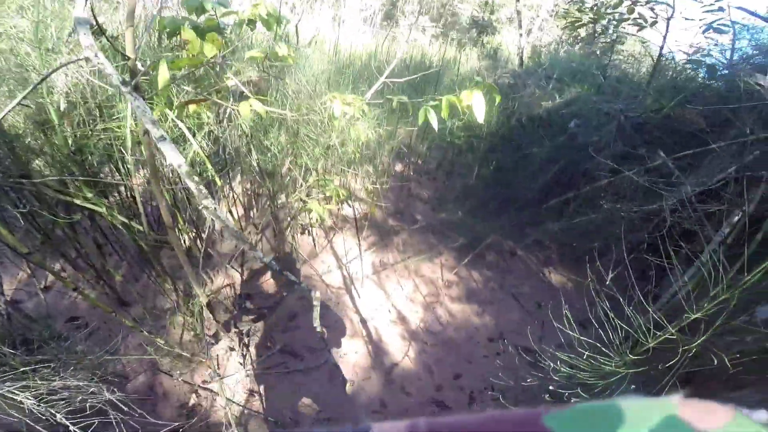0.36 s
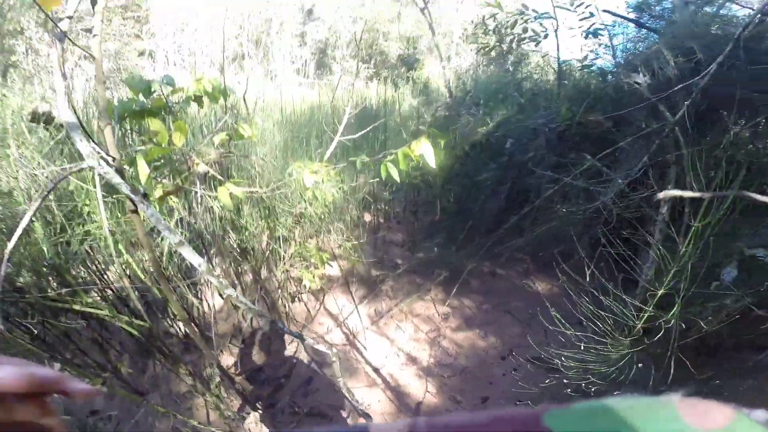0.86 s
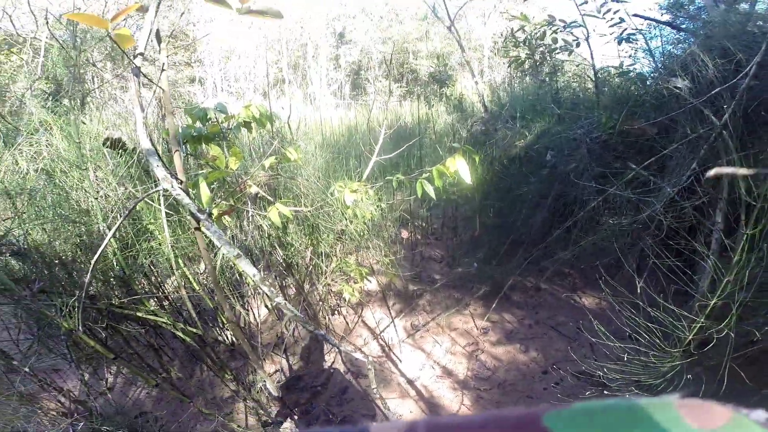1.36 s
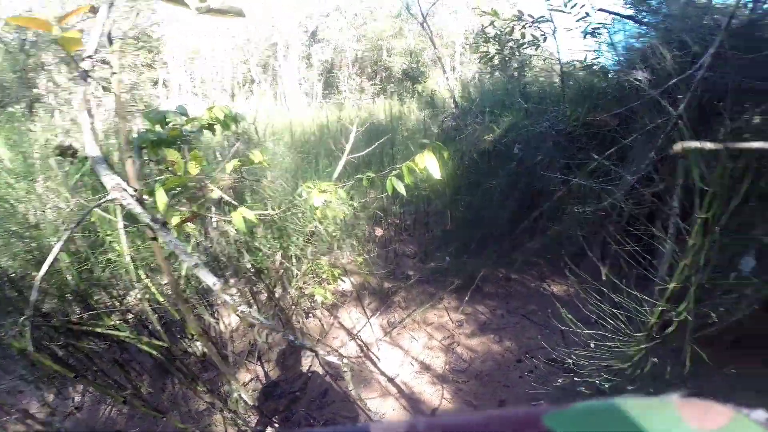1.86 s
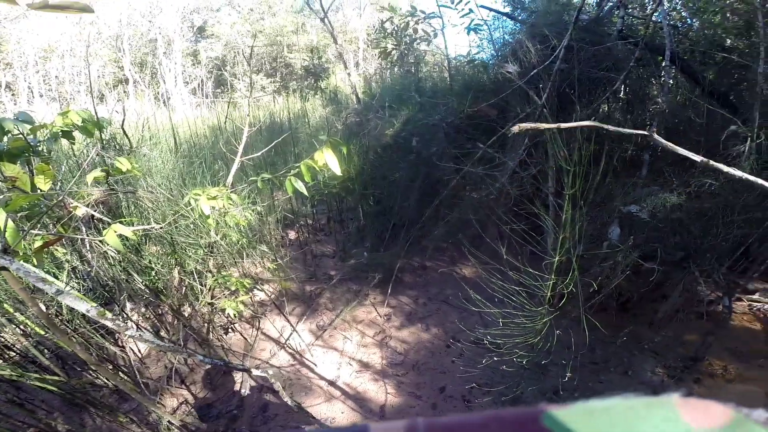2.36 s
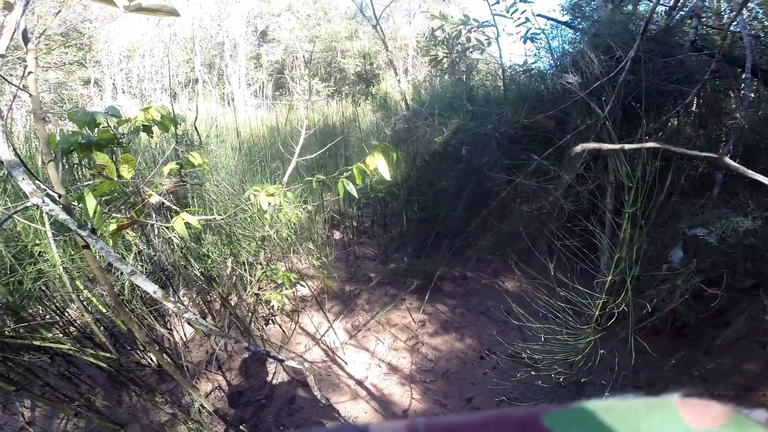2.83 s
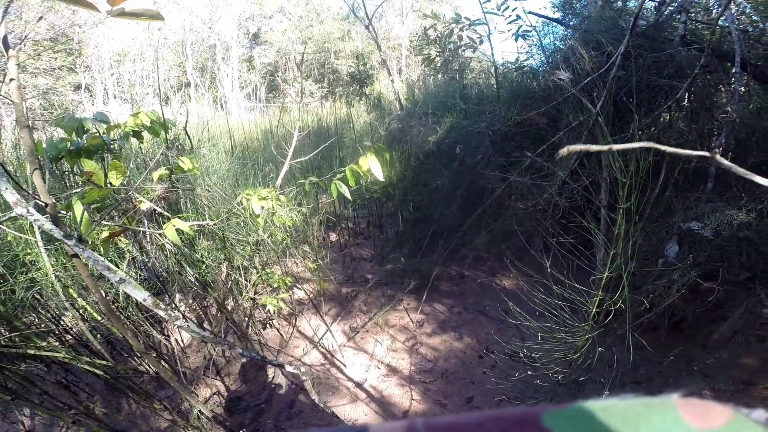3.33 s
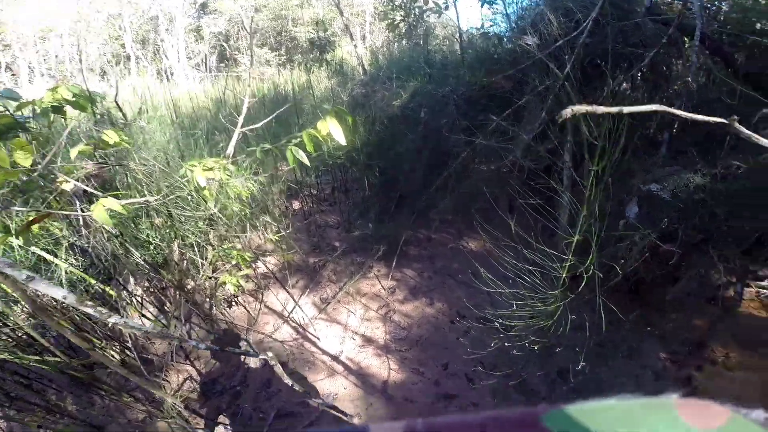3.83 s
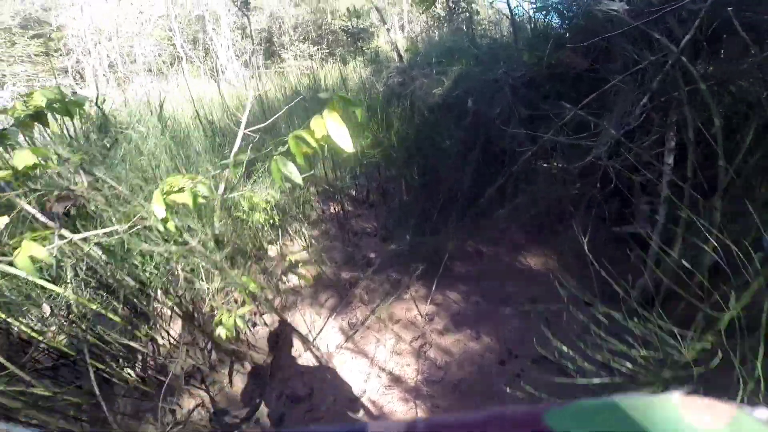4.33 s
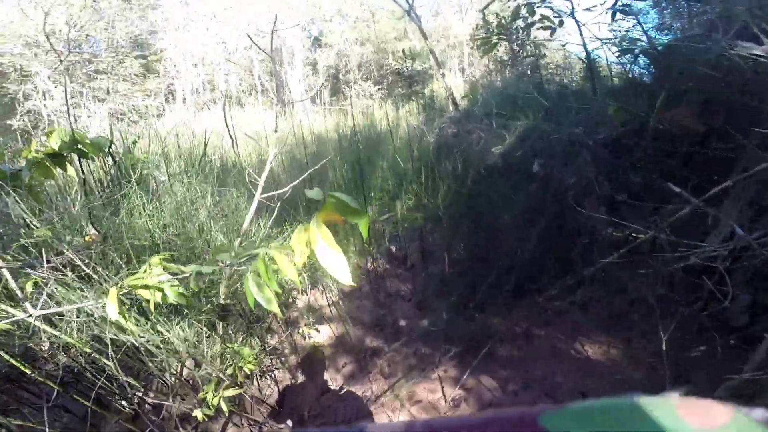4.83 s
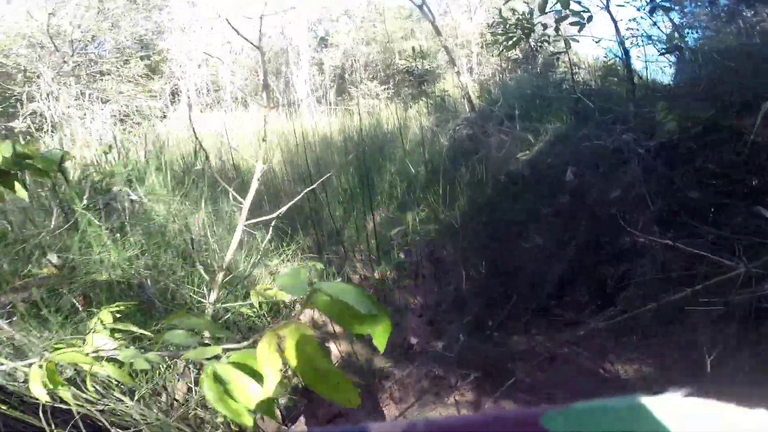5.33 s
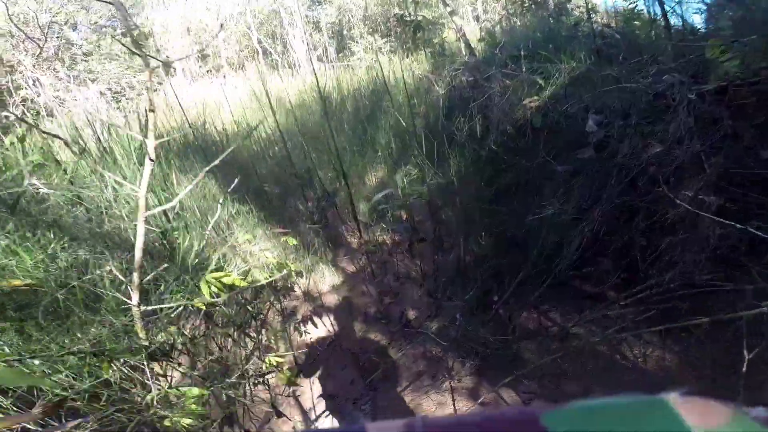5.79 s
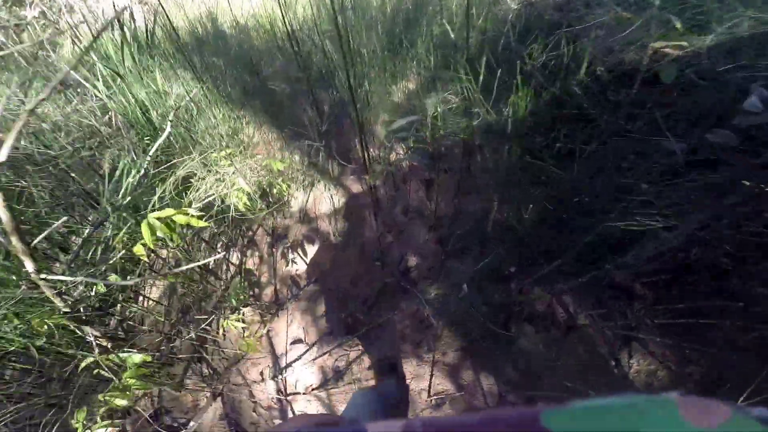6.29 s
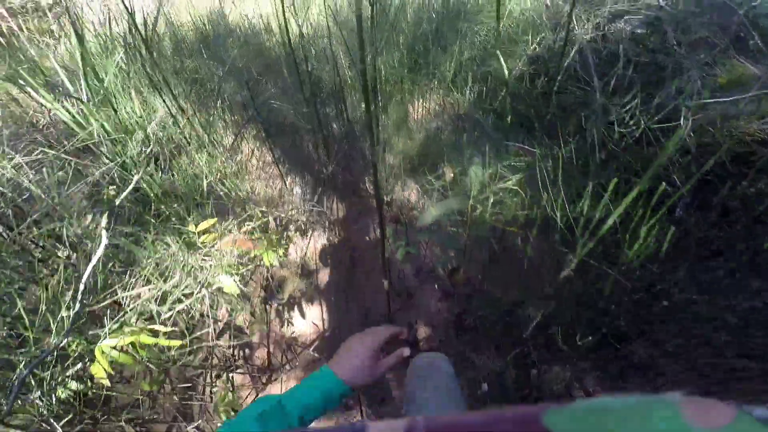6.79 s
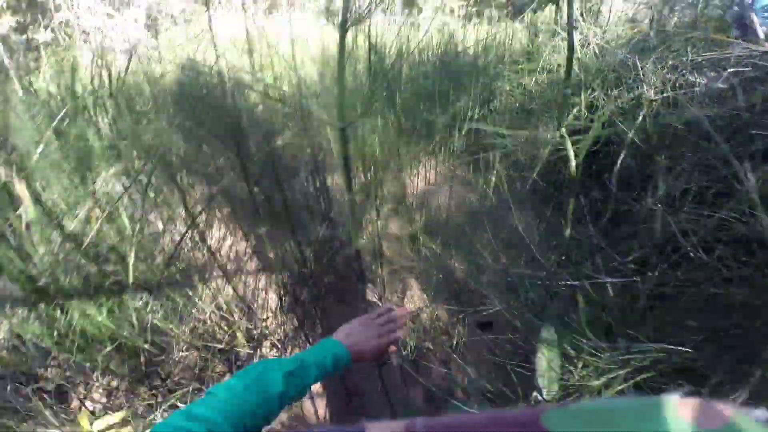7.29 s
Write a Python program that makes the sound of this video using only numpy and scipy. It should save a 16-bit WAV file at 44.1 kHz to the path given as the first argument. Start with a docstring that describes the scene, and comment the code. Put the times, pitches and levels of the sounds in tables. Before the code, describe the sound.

A distant hound bays in long, hoarse, steady howls across dry scrub while someone close by brushes through grass and snaps twigs.

```python
"""Dry scrub: a hound bays four times from some way off; trunks and bushes return a thin dying wash.
The voice is a strong sine fundamental plus wavering overtones, half-pitch lines and noise breath.
Close by, someone pushes through grass: random ticks rustle, decaying rings and hiss snap as twigs,
and low coloured noise buffets the microphone as wind. Insects (narrow noise bands) and a small bird
(two short tones) sound faintly over the outdoor hush of broadband noise."""
import sys
import numpy as np
from scipy import signal
from scipy.fft import rfft, irfft, next_fast_len
from scipy.io import wavfile
from scipy.ndimage import uniform_filter1d

SR = 44100
rng = np.random.default_rng(int(sys.argv[2]) if len(sys.argv) > 2 else 0)


def nominal_scale(level):
    """Amplitude ratio for a level in decibels (scalar or array-like)."""
    x = np.asarray(level, float) / 20
    return 10 ** x


def wav_out(sig):
    """Save sig, one row per channel (or a flat mono array), as 16-bit PCM at SR to the path in sys.argv[1]."""
    wavfile.write(sys.argv[1], SR, np.round(np.clip(np.atleast_2d(sig).T, -1, 1) * 32767).astype(np.int16))


N = 337605


def rms_one(x):
    """Scales a signal to rms 1."""
    return x / np.sqrt(np.mean(np.abs(x) ** 2) + 1e-20)


def in_time(spans):
    """Table columns over time, after a gate that is open inside the spans with 8 ms ramps."""
    s, *columns = np.transpose(np.concatenate(spans))
    t = np.arange(N) / SR
    gate = 0
    for rows in spans:
        inside_s = np.minimum(t - rows[0][0], rows[-1][0] - t)
        gate = gate + np.clip(1 + inside_s / 0.008, 0, 1)
    return [np.minimum(gate, 1)] + [np.interp(t, s, column) for column in columns]


def at_hz(points, hz):
    """Interpolates (Hz, dB) points over log frequency."""
    points = np.array(points)
    return np.interp(np.log(hz), np.log(points[:, 0]), points[:, 1])


def drift(corner_hz):
    """Slow random curve of rms 1: noise at every 20th sample through a double one-pole low-pass."""
    r = np.exp(-40 * np.pi * corner_hz / SR)
    noise = rng.standard_normal(N // 20 + 2002)
    slow = signal.lfilter([1], [1, -2 * r, r * r], noise)[2000:]
    return np.interp(np.arange(N) / 20, np.arange(len(slow)), rms_one(slow))


def coloured(x, spectrum):
    """Shapes noise by a spectrum of (Hz, dB) points; rms 1."""
    size = next_fast_len(N)
    hz = np.arange(1, size // 2 + 2) * SR / size
    shaped = rfft(x, size) * nominal_scale(at_hz(spectrum, hz))
    return rms_one(irfft(shaped, size)[:N])


def resonance(x, hz, width_hz):
    """Two-pole band-pass with gain 1 on top."""
    r = np.exp(-np.pi * width_hz / SR)
    poles = [1, -2 * r * np.cos(2 * np.pi * hz / SR), r * r]
    return signal.lfilter([(1 - r * r) / 2, 0, (r * r - 1) / 2], poles, x)


def filtered(x, order, hz, kind):
    """Butterworth filter."""
    return signal.sosfilt(signal.butter(order, hz, kind, fs=SR, output="sos"), x)


def band(x, low_hz, high_hz):
    """Butterworth band-pass; rms 1."""
    return rms_one(filtered(x, 2, [low_hz, high_hz], "band"))


# Spectrum of the open air. Each row: frequency in Hz, relative density in dB.
HUSH_SPECTRUM = [(13, -31), (22, -2.5), (127, -15.5), (163, -10.5), (198, -11), (403, -11.5), (698, -16.5),
                 (846, -16.5), (2400, -24), (5320, -30.5), (15500, -47.5)]
HUSH_RMS_DB = -55.5


def hush():
    """Steady outdoor background: broadband noise with a falling treble."""
    return nominal_scale(HUSH_RMS_DB) * coloured(rng.standard_normal(N), HUSH_SPECTRUM)


# Gusts on the microphone. Each row: middle in seconds, peak level in dB, half length in seconds.
GUSTS = [(0.226, -34, 0.021), (0.366, -41, 0.076), (0.84, -35, 0.11), (2.555, -54, 0.064),
         (4.403, -44, 0.15), (5.535, -52.5, 0.044), (5.821, -52.5, 0.065), (6.453, -49, 0.042),
         (7.236, -31, 0.017), (7.317, -52.5, 0.14), (7.646, -53, .05)]
CALM_DB, RUMBLE_PEAK_HZ = -58.5, 44.5


def wind(lumpy_db=2.5):
    """Lumpy rumble from air over the microphone port, swelling in gusts."""
    t = np.arange(N) / SR
    level = nominal_scale(CALM_DB)
    for middle_s, db, half_s in GUSTS:
        level = level + nominal_scale(db) * np.exp(-((t - middle_s) / half_s) ** 4)
    spectrum = [(10, -15), (25, -2), (RUMBLE_PEAK_HZ, 0), (90, -6), (170, -14), (280, -32), (400, -42),
                (2000, -70)]
    rumble = coloured(rng.standard_normal(N), spectrum)
    return level * rms_one(rumble * nominal_scale(lumpy_db * drift(23)))


# Insect bands. Each row: centre in Hz, width of each of two filter passes in Hz, mean level in dB.
INSECTS = [(4550, 60, -78), (5310, 40, -79)]


def insects():
    """Thin steady bands of noise, twice through a narrow resonance, drifting a little in level."""
    out = np.zeros(N)
    for hz, width_hz, db in INSECTS:
        once = resonance(rng.standard_normal(N), hz, width_hz)
        out += nominal_scale(db + 1.5 * drift(3)) * rms_one(resonance(once, hz, width_hz))
    return out


# Bird notes. Each row: start in seconds, length in seconds, pitch in Hz, level in dB before flutter.
CHIRPS = [(6.92, 0.029, 3930, -55), (6.958, 0.16, 3670, -62.5)]


def bird():
    """Two short notes, each a sine and its octave, fluttering in level."""
    out, t = np.zeros(N), np.arange(N) / SR
    for s, length_s, hz, db in CHIRPS:
        shape = np.sin(np.pi * np.clip((t - s) / length_s, 0, 1)) ** 0.5 * nominal_scale(7.5 * drift(64))
        tone = np.sin(2 * np.pi * hz * t) + 0.26 * np.sin(4 * np.pi * hz * t)
        out += nominal_scale(db) * shape * tone
    return out


# Tick bands of stems, blades and tips. Each row: low edge in Hz, high edge in Hz.
GRASS_BANDS = [(600, 5150), (5500, 9760), (10500, 15000)]
# Grass brushing past. Each row: start in seconds, time from start to decay in seconds, T60 in seconds,
# blades in dB, tips in dB re blades, stems in dB re blades; levels before flicker.
BRUSHES = [(0.187, 0.042, 0.72, -75, -10, 16), (0.291, 0.027, 0.83, -67, 1.5, 10),
           (0.719, 0.026, 0.2, -76, -8, 10), (4.357, .17, 0.11, -68.5, -1, 8),
           (6.314, 0.069, .6, -48, -11, 2.5), (6.342, 0.002, 0.12, -25.5, -22, -12),
           (7.054, 0.16, .5, -61.5, 7, 11), (7.213, 0.13, 1.2, -56, 6, 10.5),
           (7.42, .22, 0.49, -64.5, -1, 14.5)]
BRUSH_ATTACK_S = 0.0073


def rustle(ticks_per_s=4000, spread_db=2.0, flicker_db=3.2):
    """Dense tiny ticks of dry grass: thick stems tick low, blades higher, their thin tips highest."""
    t, powers, out = np.arange(N) / SR, 0, 0
    for s, hold_s, t60_s, blades_db, tips_db, stems_db in BRUSHES:
        decay = nominal_scale(-60 * np.maximum(t - s - hold_s, 0) / t60_s)
        shape = np.clip((t - s) / BRUSH_ATTACK_S, 0, 1) * decay
        part_db = blades_db + np.array([[stems_db], [0], [tips_db]])
        powers = powers + (shape * nominal_scale(part_db)) ** 2
    for (low_hz, high_hz), level in zip(GRASS_BANDS, np.sqrt(powers)):
        sizes = nominal_scale(spread_db * np.minimum(rng.exponential(1, N), 5)) * rng.choice([-1, 1], N)
        ticks = sizes * (rng.random(N) < ticks_per_s / SR)
        out = out + level * band(ticks, low_hz, high_hz)
    return nominal_scale(flicker_db * drift(35)) * out


# Twigs. Each row: start in seconds, level in dB, ring in Hz, hiss in dB re level,
# hiss T60 in seconds (5 ms at least).
SNAPS = [(0.1869, -26, 940, -21, 0.03), (0.214, -26, 1120, -20, 0.039), (0.3194, -36, 1110, -14, 0.2),
         (0.8209, -44, 1900, -17, 0.027), (2.1959, -24, 1176, -32, 0.055), (4.365, -43, 4782, -5.5, 0.1),
         (6.346, -7.5, 8200, -40, 0.025), (6.3638, -15.5, 1300, -8.5, 0.036),
         (7.1353, -24, 4070, -14.5, 0.055), (7.1417, -35, 3560, -13, 0.038),
         (7.1757, -26, 4150, -20, 0.052), (7.2216, -24.5, 1996, -1, 0.0067), (7.226, -17, 1820, -16, 0.013),
         (7.2655, -22.5, 3870, -20, 0.2), (7.3047, -19, 1030, -11.5, 0.034),
         (7.443, -14.5, 1310, -15.5, 0.11), (7.5333, -27.5, 1990, -53, 0.0583)]


def snaps(ring_cycles=6.8):
    """A crack rings a few cycles, falling 60 dB, while the shaken stems hiss out."""
    out, t = np.zeros(N + SR), np.arange(SR // 5) / SR
    for s, db, hz, hiss_db, t60_s in SNAPS:
        crack = -np.sin(2 * np.pi * hz * t + 0.2) * nominal_scale(-60 * t * hz / ring_cycles)
        noise = resonance(rng.standard_normal(len(t)), min(1.26 * hz, 9000), 3600)
        hiss = rms_one(noise) * nominal_scale(hiss_db - 60 * t / max(t60_s, 0.005))
        out[round(s * SR):][:len(t)] += nominal_scale(db) * (1.43 * crack + hiss)
    return out[:N]


SCRUB_T60_S, SCRUB_LENGTH_S, SCRUB_DB = 0.9, 0.9, -15
LEAF_CUT_HZ, TRUNK_CUT_HZ = 6000, 900  # thin trunks scatter low notes less


def scrub(x, treeline_s=0.13, treeline_db=3.0, sway_db=3.0):
    """Scatters a thin wash, weak in the lows and softened above 6 kHz; a tree line answers stronger."""
    t = np.arange(int(SCRUB_LENGTH_S * SR)) / SR
    shape_db = -60 * t / SCRUB_T60_S + treeline_db * np.exp(-((t - treeline_s) / 0.02) ** 2)
    tail = rng.standard_normal(len(t)) * nominal_scale(shape_db) * np.clip(t / 0.025, 0, 1)
    tail = filtered(tail, 1, LEAF_CUT_HZ, "low")
    tail = filtered(tail, 1, TRUNK_CUT_HZ, "high")
    wash = signal.fftconvolve(x, tail / np.sqrt(np.sum(tail ** 2)))[:N]
    # swaying leaves make it flicker
    return nominal_scale(SCRUB_DB + sway_db * drift(13)) * wash


# Short grunts that close or follow a howl. Each row: start in seconds, level in dB before a 0.5 dB lift,
# starting pitch in Hz, half length in seconds.
GRUNTS = [(2.9, -49.5, 410, 0.035), (4.608, -55, 249, 0.012), (4.829, -46, 315, 0.013),
          (4.85, -63, 271, 0.041), (6.438, -42.5, 369, 0.035), (6.738, -44, 327.3, 0.04),
          (6.76, -47, 279, 0.0094), (6.982, -46.5, 298, 0.0087), (7.067, -50.5, 291, 0.02)]
# Level in dB of each harmonic, from the first.
GRUNT_HARMONICS_DB = [4, 8.5, -8, -11.5, -17.5]


def grunts():
    """A few low cycles that sag in pitch."""
    out = np.zeros(N)
    for s, db, hz, half_s in GRUNTS:
        t = np.arange(int(2 * half_s * SR)) / SR
        shape = np.sin(np.pi * np.sqrt(t / (2 * half_s))) ** 2
        phase = 2 * np.pi * hz * (t - 1.29 * t ** 2)
        stack = 0
        for order, order_db in enumerate(GRUNT_HARMONICS_DB, 1):
            stack = stack + nominal_scale(order_db) * np.sin(order * phase)
        out[round(s * SR):][:len(t)] += nominal_scale(db + 0.5) * shape * stack
    return out


# Bright openings of the howls. Each row: yelp in seconds, held overtones in dB, their drift in dB/s,
# lift of the high throat ring in dB.
YELPS = [(1.741, -39, -3.5, 2.5), (3.211, -40.5, -3.5, 3), (5.245, -38.5, -.5, 6.5), (7.545, -34.5, 18, 1)]
YELP_DB, YELP_S, YELP_DULLS_RING_DB = 5.5, 0.037, 13.5


def yelps():
    """Overtone level and throat-ring lift in dB: held through each howl, changed briefly by its yelp."""
    s, over_db, db_per_s, ring_db = np.transpose(YELPS)
    t = np.arange(N) / SR
    starts_s = [rows[0][0] - 0.02 for rows in HOWLS]
    howl = np.clip(np.searchsorted(starts_s, t) - 1, 0, None)
    since_s = t - s[howl]
    yelp = np.exp(-(since_s / YELP_S) ** 2)
    level_db = over_db[howl] + db_per_s[howl] * since_s + YELP_DB * yelp
    return level_db, ring_db[howl] - YELP_DULLS_RING_DB * yelp ** 0.26


# Relative overtone levels from the throat. Each row: frequency in Hz, level in dB.
THROAT = [(530, -16.5), (900, -1), (1080, -5), (1290, -9), (1640, -14), (1910, -15.5), (2200, -23),
          (2410, -26.5), (2680, -28), (3510, -51), (4300, -38), (4900, -34.5), (5700, -40), (6500, -50.5),
          (8500, -70.5), (11000, -83.5), (18700, -120)]
RING_ABOVE_HZ, HALF_SLOPE_DB_PER_OCTAVE = 3000, -6


def throat_lines(hz, phase, rough, ring_db, fade_db=3.0, blur_hz=25, blur_order=6.5, half_blur=0.5):
    """Overtones, and lines half-way from every second cycle differing; each sum has rms 1."""
    overtones, halves = 0, 0
    for k in range(3, 27):
        order = k / 2
        # paths through the scrub make each line fade on its own
        line_db = at_hz(THROAT, order * hz) + fade_db * rough ** 0.083 * drift(10.4)
        line_db = line_db + ring_db * (order * hz > RING_ABOVE_HZ)
        angle = order * phase + rng.uniform(0, 2 * np.pi)
        # uneven cycles blur high and half-way lines most
        share = 1 - (1 - rough) ** (order / blur_order + half_blur * (k % 2))
        in_phase = np.sqrt(1 - share) + np.sqrt(share / 2) * drift(blur_hz * order)
        quadrature = np.sqrt(share / 2) * drift(blur_hz * order)
        line = nominal_scale(line_db) * (in_phase * np.sin(angle) + quadrature * np.cos(angle))
        if k % 2:
            halves = halves + line * nominal_scale(HALF_SLOPE_DB_PER_OCTAVE * np.log2(order))
        else:
            overtones = overtones + line
    return rms_one(overtones), rms_one(halves)


# The four howls, a list of rows each. Each row: time in seconds, pitch in Hz before waver,
# fundamental rms in dB before flutter.
HOWLS = [
    [(1.688, 491, -56.5), (1.71, 508.3, -30), (1.76, 538, -16), (1.9, 523.3, -28), (2.02, 517.5, -33.5),
     (2.14, 521.4, -21.5), (2.275, 531.2, -33), (2.43, 515, -26.5), (2.505, 534.4, -30),
     (2.58, 513.7, -32.5), (2.81, 524.4, -22.5), (2.875, 526.7, -31.5), (2.905, 484, -37.5)],
    [(3.138, 362, -50), (3.165, 396, -40.5), (3.205, 477, -29), (3.24, 487.3, -20.5), (3.28, 523.6, -37.5),
     (3.35, 524.4, -26), (3.41, 502.4, -39.5), (3.55, 515, -28.5), (3.72, 484.3, -23), (3.83, 515.7, -31),
     (3.92, 485.7, -27.5), (4.09, 516.7, -25.5), (4.16, 491.5, -34), (4.185, 403, -33.5), (4.225, 389, -46)],
    [(5.222, 502, -60), (5.262, 481.4, -17), (5.275, 478, -25), (5.29, 525, -33), (5.47, 546, -33),
     (5.53, 539, -27), (5.56, 515, -31.5), (5.66, 540, -29.5), (5.85, 495.4, -25), (5.9, 517, -26),
     (6.09, 522.6, -28.5), (6.28, 525.7, -19), (6.405, 522, -22.5), (6.43, 511, -35), (6.462, 345, -42)],
    [(7.52, 502, -54), (7.54, 517.5, -23.5), (7.565, 520.4, -17.5), (7.59, 559, -34), (7.635, 526, -27.5),
     (7.655, 497, -49)],
]
# Hoarseness. Each row: time in seconds, roughness from 0 to 1.
ROUGH = [(1.7, .28), (2.0, .75), (2.5, .8), (2.62, .45), (2.9, .6), (3.2, .42), (3.33, .7), (3.6, .5),
         (4.2, .45), (5.22, .35), (5.32, .05), (5.74, .08), (5.8, .65), (6.1, .3), (6.4, .5), (7.5, .6)]
# Half-pitch lines. Each row: time in seconds, level in dB before fading with a faint fundamental.
HALVES = [(1.72, -56), (1.85, -38.5), (1.93, -48.5), (2.53, -42), (2.63, -36), (2.9, -45), (3.18, -44.5),
          (3.22, -50.5), (3.42, -42.5), (4.2, -41.5), (5.25, -50), (5.44, -76.5), (5.62, -55),
          (6.37, -33.5), (6.46, -34), (7.54, -63), (7.655, -73)]
SAG_DULLS_DB_PER_HZ = 0.4  # a collapsing pitch loses its overtones
FAINT_DB = -36.5  # below this fundamental level the other lines fade with it


def howls(waver=0.004934, flutter_db=1.0, breath_db=-5, skirt_db=-24):
    """A strong wavering fundamental with overtones, half-pitch lines and hoarse breath."""
    gate, hz, level_db = in_time(HOWLS)
    rough = in_time([ROUGH])[1]
    over_db, ring_db = yelps()
    faint_db = np.minimum(level_db - FAINT_DB, 0)
    fall_hz = np.minimum(np.gradient(hz) * SR * 0.01, 0)  # in 10 ms
    sag_db = uniform_filter1d(SAG_DULLS_DB_PER_HZ * fall_hz, size=900)
    over_db = over_db + faint_db + sag_db
    half_db = in_time([HALVES])[1] + faint_db
    phase = 2 * np.pi * np.cumsum(hz * (1 + waver * drift(24.0))) / SR
    overtones, halves = throat_lines(hz, phase, rough, ring_db)
    lines = nominal_scale(over_db) * overtones + nominal_scale(half_db) * halves
    uneven = 1 + nominal_scale(skirt_db) * band(rng.standard_normal(N), 14, 170)
    fundamental = nominal_scale(level_db + flutter_db * drift(42)) * np.sqrt(2) * np.sin(phase) * uneven
    # the hoarser the voice, the more air rushes through the throat
    air = coloured(rng.standard_normal(N), [(550, -25.5)] + list(THROAT[1:]))
    breath = np.sqrt(rough) * nominal_scale(over_db + breath_db) * air
    return filtered(gate * (fundamental + lines + breath), 4, 330, "high")


def scene():
    """The open air, the near brush and the far hound with its echo."""
    hound = howls() + grunts()
    air = hush() + wind() + insects() + bird()
    brush = rustle() + snaps()
    return (air + brush + scrub(hound) + hound)[None]


def low_pass(x):
    """Removes everything above the highest recorded frequency."""
    return signal.sosfilt(signal.butter(12, 16020, fs=SR, output="sos"), x)


def record(dry):
    """A steep low-pass cuts the top from 15.9 kHz."""
    mix = signal.sosfilt(signal.cheby2(10, 50, 15900, fs=SR, output="sos"), dry)
    return low_pass(mix)


dry = scene()
out = record(dry)
wav_out(out)
```